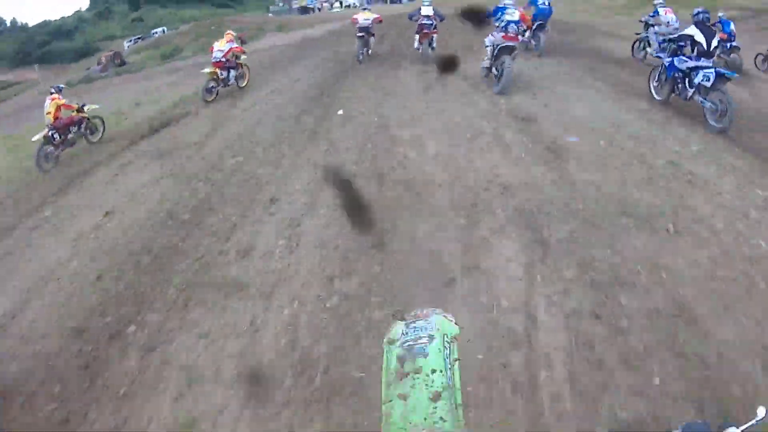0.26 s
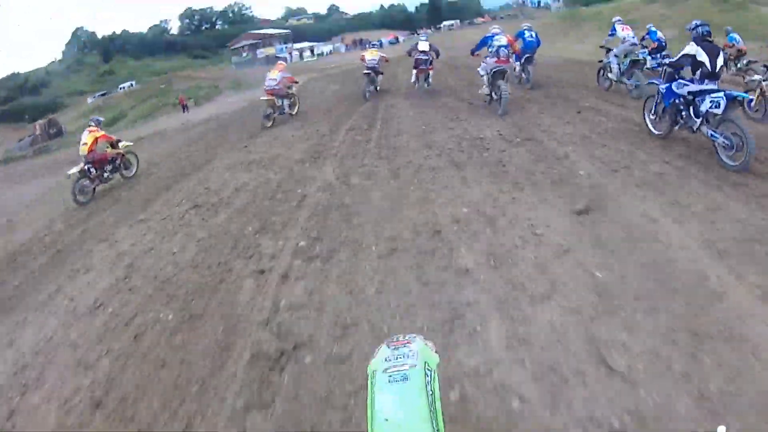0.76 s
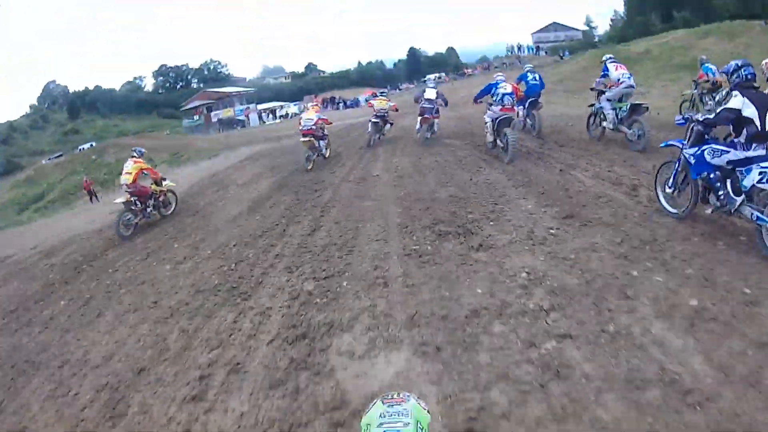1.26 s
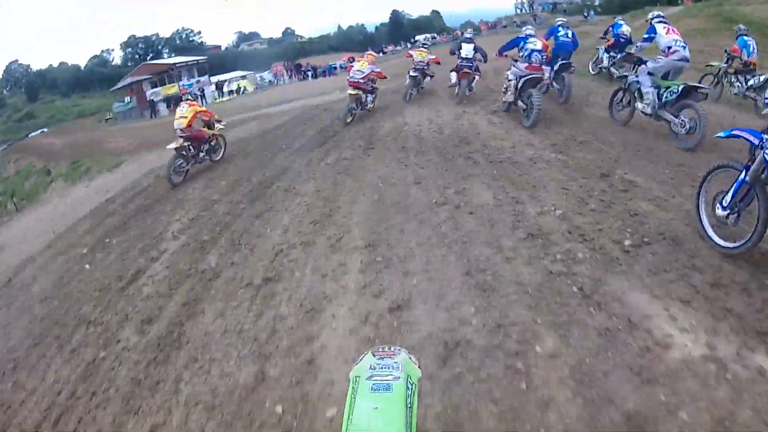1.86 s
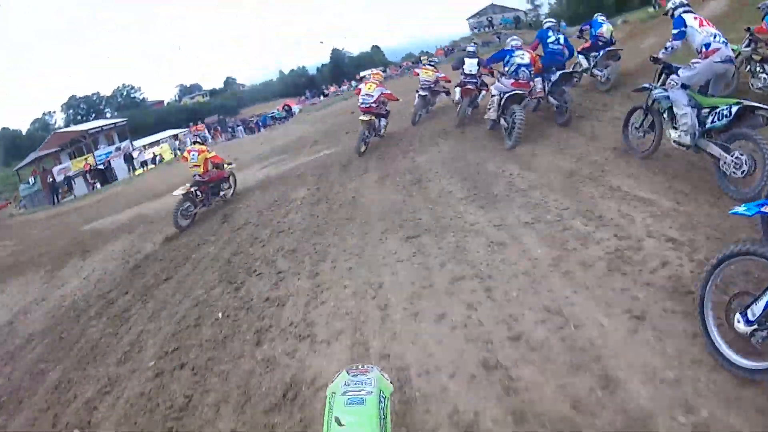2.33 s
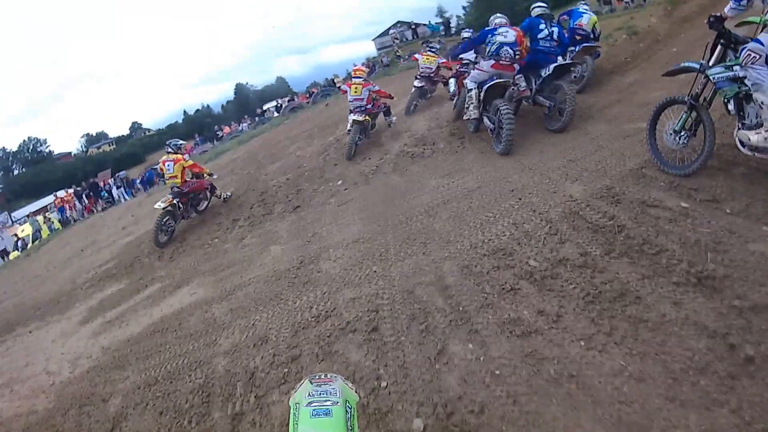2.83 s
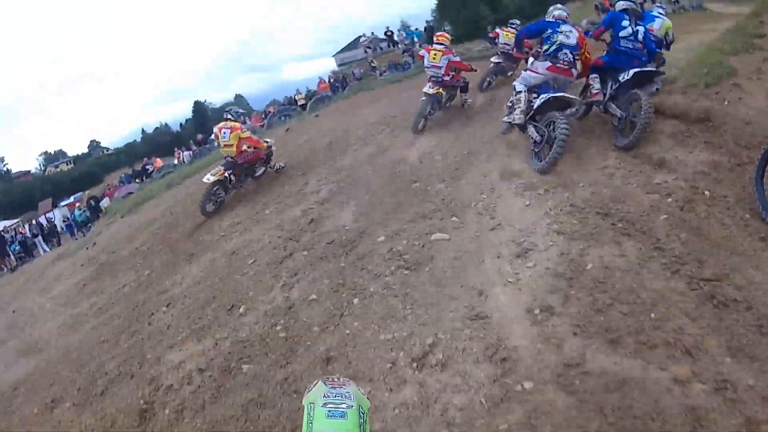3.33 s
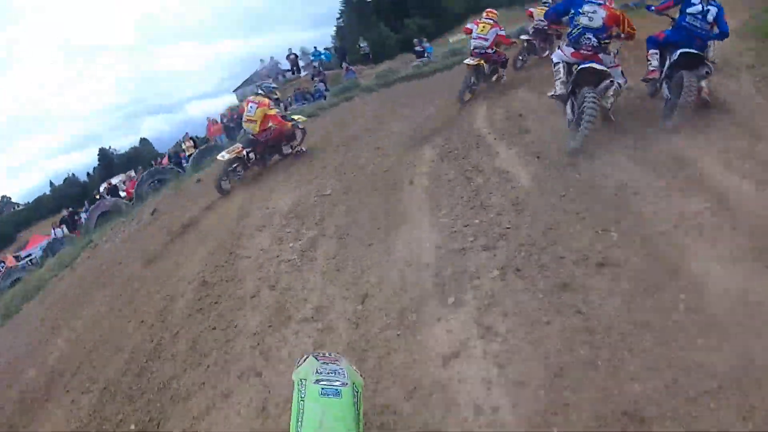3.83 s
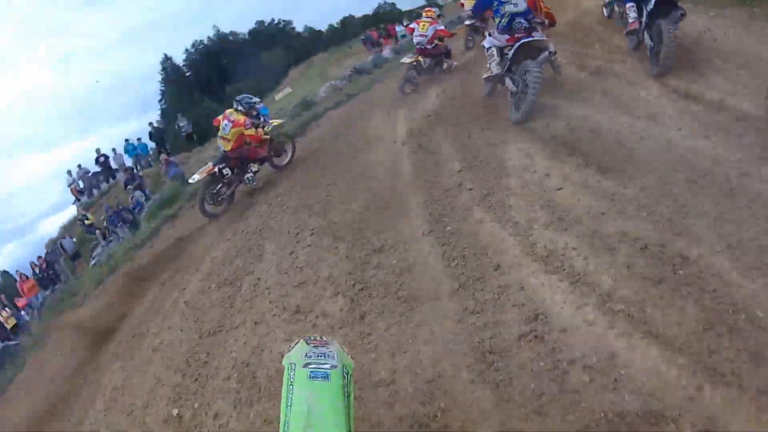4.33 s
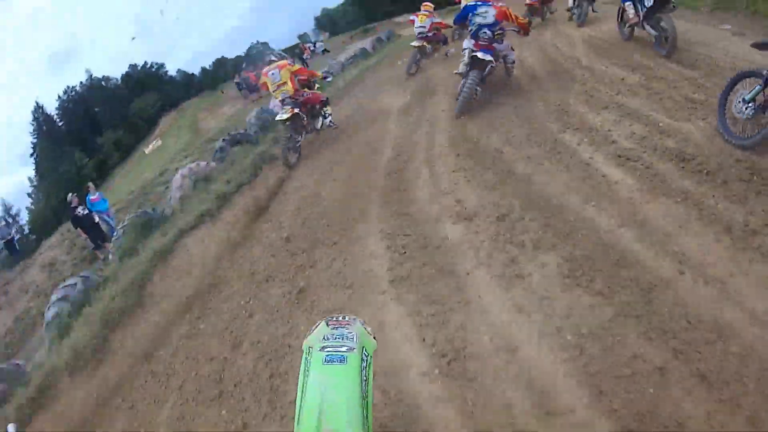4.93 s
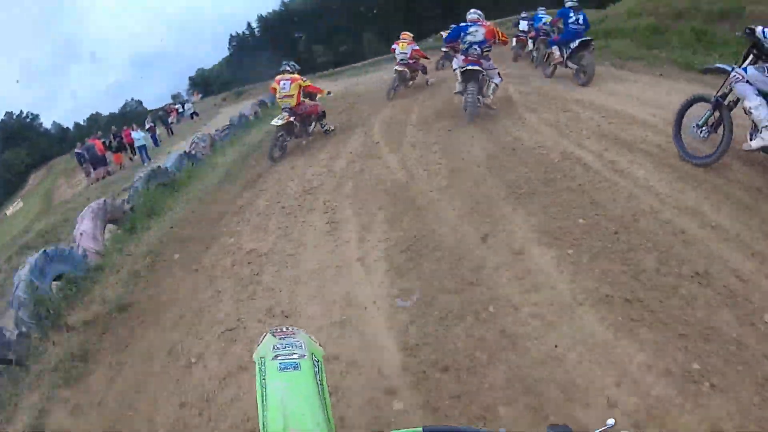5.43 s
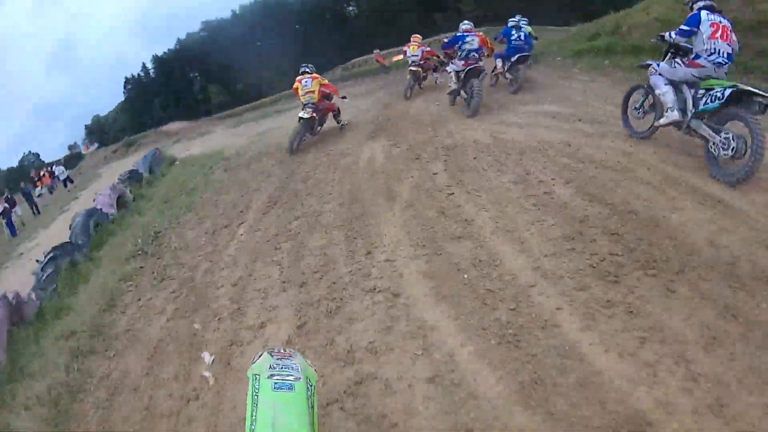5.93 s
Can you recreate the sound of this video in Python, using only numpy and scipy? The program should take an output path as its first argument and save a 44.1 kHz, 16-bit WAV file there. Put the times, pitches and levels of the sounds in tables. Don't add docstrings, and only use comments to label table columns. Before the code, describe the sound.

Gravel batters a bike-mounted camera, then muffled racing engines drop back and swell again, with single exhausts rasping close amid sharp hollow knocks.

```python
import sys
import numpy as np
from scipy import signal
from scipy.fft import rfft, irfft
from scipy.io import wavfile

SR = 44100
rng = np.random.default_rng(int(sys.argv[2]) if len(sys.argv) > 2 else 0)


def master_out(mix):
    frames = np.transpose(np.atleast_2d(mix))
    ceiling = np.clip(frames, -1, 1)
    pcm = np.round(ceiling * 32767).astype(np.int16)
    wavfile.write(sys.argv[1], SR, pcm)


def linear_from_db(decibels):
    return 10 ** (np.asarray(decibels, float) / 20)


N = 272979


def at_time(rows):
    time_s, value = np.transpose(rows)
    return np.interp(np.arange(N) / SR, time_s, value)


def rms_one(x):
    return x / np.sqrt(np.mean(x ** 2) + 1e-20)


def drift(rate_hz):
    hop = 40
    pole = np.exp(-2 * np.pi * rate_hz * hop / SR)
    noise = rng.standard_normal(N // hop + 2002)
    slow = signal.lfilter([1], [1, -2 * pole, pole * pole], noise)[2000:]
    return np.interp(np.arange(N) / hop, np.arange(len(slow)), rms_one(slow))


def band(x, low_hz, high_hz, order=2):
    return signal.sosfilt(signal.butter(order, [low_hz, high_hz], "band", fs=SR, output="sos"), x)


def low_pass(order, cutoff_hz):
    return signal.butter(order, cutoff_hz, fs=SR, output="sos")


def resonance(x, hz, width_hz):
    r = np.exp(-np.pi * width_hz / SR)
    zeros = np.array([1, 0, -1]) * (1 - r * r) / 2
    poles = [1, -2 * r * np.cos(2 * np.pi * hz / SR), r * r]
    return signal.lfilter(zeros, poles, x)


def through_shell(x):
    # freq_hz, level_db_per_hz
    shell = [(24, -23.5), (100, -29), (250, -25.5), (500, -20), (950, -16), (1300, 0.5), (2200, -1),
             (3250, -3), (4200, -22.5), (5400, -37.5), (7000, -53), (9000, -49.5), (11500, -54.5),
             (16000, -62.5)]
    # freq_hz, width_hz, gain_db
    shell_modes = [(1377, 45, 5), (1581, 63, 6.5), (1917, 170, 4), (2582, 210, -11.5), (2910, 360, 5),
                   (5960, 210, -20), (6960, 850, 9.5), (8020, 500, -24.5), (10900, 1800, 6.5)]
    size = 4096
    hz = np.maximum(np.fft.rfftfreq(size, 1 / SR), 1)
    shell_hz, shell_db = np.transpose(shell)
    level_db = np.interp(np.log(hz), np.log(shell_hz), shell_db)
    for mode_hz, width_hz, gain_db in shell_modes:
        level_db = level_db + gain_db / (1 + (2 * (hz - mode_hz) / width_hz) ** 2)
    cepstrum = irfft(np.maximum(level_db, -90) * np.log(10) / 20)
    cepstrum[1:size // 2] *= 2
    cepstrum[size // 2 + 1:] = 0
    response = irfft(np.exp(rfft(cepstrum)))
    return signal.fftconvolve(x, response / np.linalg.norm(response))[:N]


def exhaust(firing_hz, pipe_hz, boost_db, alternate_db, rough, puff_ms=5.4, echo_ms=2.2):
    turns = np.cumsum(firing_hz * (1 + .008 * rough * drift(40))) / SR
    count = np.floor(turns)
    fired = np.diff(count, prepend=0) > 0
    strength = linear_from_db(alternate_db * (count % 2) + 5.0 * rough * rng.standard_normal(N))
    bangs = fired * strength * np.sqrt(SR / firing_hz)

    tap = np.arange(500)
    echoes = rng.standard_normal(500) * np.exp(-tap / (echo_ms / 1000 * SR))
    smeared = signal.oaconvolve(bangs, echoes / np.linalg.norm(echoes))[:N]

    fade = np.exp(-1000 / (puff_ms * SR))
    puff_level = signal.lfilter([np.sqrt(1 - fade ** 2)], [1, -fade], bangs)
    puffs = puff_level * rng.standard_normal(N)

    gas = np.sqrt(1 - rough) * smeared + np.sqrt(rough) * puffs
    return gas + (linear_from_db(boost_db) - 1) * resonance(gas, pipe_hz, 300), turns


def far_pack(pack_db, wander=.08, blur_db=-3):
    far_engines = [65.66, 84.2, 103, 120.55, 142.45, 166.9]
    engines = np.zeros(N)
    for hz in far_engines:
        swell = linear_from_db(2 * drift(3.9))
        firing_hz = hz * (1 + wander * drift(1.2))
        engines += swell * exhaust(firing_hz, 1500, 0, 2, rough=.4)[0]
    blur = linear_from_db(blur_db + 0.65 * drift(19)) * rng.standard_normal(N)
    return linear_from_db(pack_db + 1.5) * rms_one(rms_one(engines) + blur)


def spray(pack_db):
    # start_s, length_s, level_db
    gusts = [(0.0, .36, -37), (.68, .02, -57), (.8, .02, -62), (1.623, .05, -64), (2.052, .1, -57.5),
             (2.433, .01, -64), (2.52, .01, -64.5), (3.24, .12, -55.5), (3.6, .12, -60.5),
             (3.95, .15, -63.5), (4.38, .06, -59), (4.557, .52, -51.5), (5.685, .07, -52.5),
             (5.817, 0.31, -53.5)]
    hiss_db, db_per_pack_db, edge_s = -65.5, 1.1, 0.065
    t = np.arange(N) / SR
    level = linear_from_db(hiss_db + db_per_pack_db * (pack_db - pack_db.mean()))
    for start_s, length_s, level_db in gusts:
        inside_s = np.minimum(t - start_s, start_s + length_s - t)
        level = level + linear_from_db(level_db) * np.clip(inside_s / edge_s + 1, 0, 1) ** 2
    hiss = rms_one(band(through_shell(rng.standard_normal(N)), 9800, 16000))
    return hiss * level * linear_from_db(8.5 + 2.8 * drift(25))


def gravel_roost():
    end_s, per_s, first_db = .37, 90, 2
    rows = []
    for when, force, pitch, press in rng.random((round(end_s * per_s), 4)):
        peak_db = first_db - 5 * when + 6 * (force - .5)
        rows.append((end_s * when ** 1.2, peak_db, 1330 * 2.4 ** (pitch ** 3), -19.5, 4 + 9 * press))
    return rows


def stones():
    # start_s, peak_db, ring_hz, thud_under_ring_db
    stone_hits = [(.422, -2, 1880, -19.5), (.470, -12, 1570, -30), (.640, -6, 2300, -35),
                  (.695, -13, 1600, -45), (1.075, -22, 1560, -8.5), (2.2165, -3, 1750, -14),
                  (2.2185, -5, 2900, -30), (2.580, -15, 1530, -34), (2.625, -20, 1900, -16),
                  (2.886, -15, 1900, -33), (3.233, -14, 1560, -23), (3.472, -6, 1400, -35),
                  (3.590, -10, 2900, -12.5), (4.010, -7, 1830, -18), (4.065, -12, 1320, -23),
                  (4.172, -8, 1350, -21), (4.195, -9, 1350, -28), (4.313, -3, 1900, -28),
                  (4.338, -6, 1600, -19), (4.831, -5, 2080, -26), (5.176, -6, 1700, -16),
                  (5.285, -4, 1590, -14), (5.500, -6, 1750, -23), (5.690, -6, 2900, -22)]
    # start_s, peak_db, ring_hz, thud_under_ring_db
    clod_hits = [(1.148, -10, 1350, -6), (1.171, -14, 1600, -30), (1.192, -17, 1600, -32),
                 (1.210, -16, 1700, -37), (1.850, -3, 2000, -20), (4.424, 2, 1440, -12),
                 (5.740, 1, 2000, -12)]
    # start_s, peak_db, pitch_hz
    sand_ticks = [(0.6785, -51, 10900), (0.804, -49.5, 10200), (1.8502, -41, 11240), (2.2153, -30, 10030),
                  (2.3594, -49.5, 13200), (2.4435, -44, 10900), (2.525, -53.5, 9750), (3.2, -53, 10900),
                  (3.5883, -40.5, 9600), (4.4254, -37, 9580), (4.979, -37, 10900), (5.694, -32, 9800),
                  (5.74, -31.5, 11540)]
    stone_ms, clod_ms = 4, 7
    knock, sand = np.zeros(N), np.zeros(N)
    t = np.arange(1500) / SR
    hits = gravel_roost()
    hits += [row + (stone_ms,) for row in stone_hits]
    hits += [row + (clod_ms,) for row in clod_hits]
    for start_s, peak_db, ring_hz, thud_db, contact_ms in hits:
        i = round(start_s * SR)
        contact = np.exp(-(t / (contact_ms / 1000)) ** 4) * np.minimum(t / .0007, 1)
        grit = band(rng.standard_normal(len(t)), 1170, 3130)
        ring = linear_from_db(peak_db - 3) * contact * (np.sin(2 * np.pi * ring_hz * t) + 1.5 * grit)
        thud_hz = 99 - 17.5 * peak_db
        if contact_ms == clod_ms:
            thud_hz *= 2.8
        thud_shape = (t / .001) * np.exp(1 - t / .001)
        thud = linear_from_db(peak_db + thud_db) * np.cos(2 * np.pi * thud_hz * t) * thud_shape
        knock[i:i + len(t)] += ring + thud
    for start_s, peak_db, pitch_hz in sand_ticks:
        i = round(start_s * SR)
        grain = resonance(rng.standard_normal(len(t)), pitch_hz, 1800)
        sand[i:i + len(t)] += linear_from_db(peak_db + 5) * np.exp(-t / 0.0022) * grain
    dull = signal.sosfilt(low_pass(6, 4000), knock)
    return dull + band(sand, 8300, 15500)


def sung_gain(hz, centre_hz, width_hz, gain_db, second_db):
    first = 1 / (1 + (2 * (hz - centre_hz) / width_hz) ** 4)
    second = linear_from_db(second_db) / (1 + (2 * (hz - 2770) / 240) ** 4)
    leak = linear_from_db(-30) * (hz < 1000)
    return linear_from_db(gain_db) * (first + second + leak)


def near_bikes(pack_db):
    # time_s, firing_hz
    two_strokes = [
        [(0.49, 137.1), (0.77, 133.7), (0.83, 125.3), (1.05, 115.4)],
        [(2.09, 125.1), (2.125, 128.7), (2.2, 127)],
        [(2.26, 114.9), (2.56, 96)],
        [(2.6, 107.6), (2.69, 103), (2.93, 102.1), (3.05, 105.5), (3.2, 104.7)],
        [(3.22, 127), (3.26, 123.8), (3.35, 126.6), (3.46, 126.1)],
        [(3.565, 145.5), (3.68, 147.7), (3.73, 149), (3.755, 153)],
        [(3.88, 123.4), (3.92, 123.7), (3.994, 133.7), (4.144, 132), (4.22, 136.8)],
        [(4.31, 138.9), (4.352, 144.3), (4.45, 143.4), (4.492, 146.6), (4.54, 161)],
        [(4.555, 164), (4.602, 173.6), (4.668, 161.5), (4.69, 163.2)],
        [(4.69, 159.7), (4.778, 167.3), (4.858, 163.9), (4.898, 170.9), (5.004, 158.9), (5.1, 166.2),
         (5.2, 171.5), (5.29, 164.6)],
        [(5.84, 146.6), (5.938, 138.1), (6.07, 136.5), (6.136, 132.5), (6.19, 134.1)],
    ]
    # time_s, firing_hz
    four_stroke = [(4.84, 67.54), (4.972, 70.22), (5.206, 68.33), (5.376, 66.88), (5.446, 67.48),
                   (5.58, 70.3), (5.74, 69.54), (5.88, 66.7)]
    # resonance_hz, boost_db, strong_weak_firing_db, level_over_pack_db
    pipes = [(1460, -7.5, 0.5, -5), (1270, 5.5, -10.5, 1), (1500, 2, -1.5, -11.5), (1000, 7, -3.5, -6),
             (1150, -0.5, -3, -5), (2900, 13, 2.2, -3), (1350, 11, -3.2, -5.5), (1320, 7, 2.5, -3),
             (1380, 15, -10, -0.5), (1320, -0.5, 3.5, -8), (1250, 2, 5, -2), (1820, 14, -7.5, 2)]
    roughness = [.3, .2, .3, .25, .25, .15, .25, .2, .15, .15, .2, .15]
    singing = {1: (1354, 383, -0.5, -6), 5: (1450, 440, 1, 1.1), 7: (1480, 450, -3.5, -28),
               8: (1340, 216, 5, -35), 9: (1249, 330, -0.9, -30), 10: (1451, 296, -9.5, -28),
               11: (1700, 647.5, -8.5, -31)}
    gas, tones = np.zeros(N), np.zeros(N)
    t = np.arange(N) / SR
    flutter = linear_from_db(1.9 * drift(6.8))
    bumps_db = 2 * drift(11)
    for k, rows in enumerate(two_strokes + [four_stroke]):
        pipe_hz, boost_db, alternate_db, over_pack_db = pipes[k]
        sings = k in singing
        firing_hz = at_time(rows)
        inside_s = np.minimum(t - rows[0][0], rows[-1][0] - t)
        edge = np.clip(inside_s / .03 + .5, 0, 1)
        on = edge > 0
        level = edge * linear_from_db(pack_db + over_pack_db + np.roll(bumps_db, 20000 * k))
        bang, turns = exhaust(firing_hz, pipe_hz, boost_db, alternate_db, roughness[k])
        gas += level * bang * linear_from_db(-4 if sings else 0)
        order_end = min(33, int(3300 / rows[0][1])) if sings else 7
        for m in range(2, order_end):
            gain = sung_gain(m * firing_hz[on], *singing[k]) if sings else linear_from_db(-43)
            wobble = gain * np.roll(flutter, 9000 * m)[on]
            tones[on] += level[on] * wobble * np.sin(2 * np.pi * m * turns[on] + .12 * m * m)
    return gas, tones


def scene():
    # time_s, level_db
    pack_curve = [(0.0, -6.5), (0.15, -7), (0.23, -10), (0.33, -15), (0.4, -20), (0.52, -24.5), (1.41, -28),
                  (2.1, -26), (2.79, -30), (3.17, -25), (3.28, -22.5), (3.5, -21.5), (3.6, -18.5),
                  (4.28, -18.5), (4.5, -15.5), (5.8, -16), (5.87, -21), (6.19, -20.5)]
    pack_db = at_time(pack_curve)
    gas, tones = near_bikes(pack_db)
    inside = linear_from_db(-1.5) * through_shell(far_pack(pack_db) + gas)
    side = linear_from_db(0.84 * drift(1.1))
    inside = inside + (side - 1) * band(inside, 1800, 5000)
    return (inside + spray(pack_db) + tones + stones())[None]


def roll_off(x):
    return signal.sosfilt(signal.butter(12, 15850, fs=SR, output="sos"), x)


def record(dry, knee=6.9):
    clip_up, clip_down = .59, .53
    top = np.where(dry > 0, clip_up, clip_down)
    spill = dry / (1 + np.abs(dry / top) ** knee) ** (1 / knee) - dry
    spill = signal.sosfiltfilt(low_pass(4, 4100), spill) + linear_from_db(-59.5) * spill
    no_rumble = signal.butter(1, 14, "high", fs=SR, output="sos")
    mix = signal.sosfilt(no_rumble, dry + spill)
    return roll_off(mix)


dry = scene()
out = record(dry)
master_out(out)
```